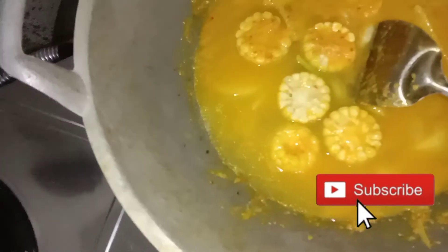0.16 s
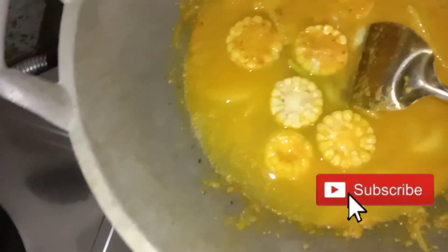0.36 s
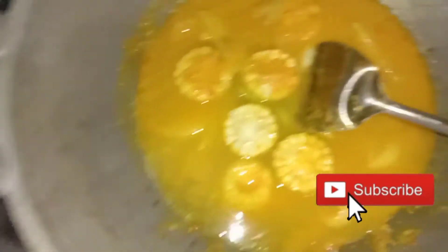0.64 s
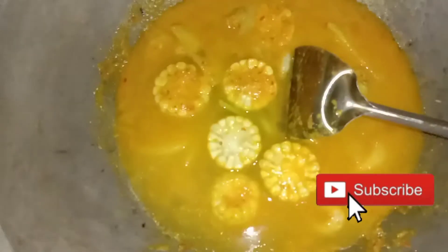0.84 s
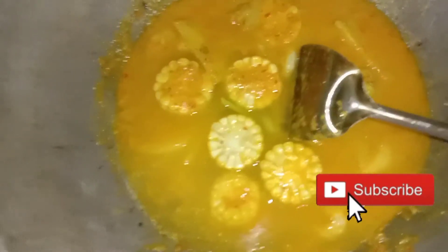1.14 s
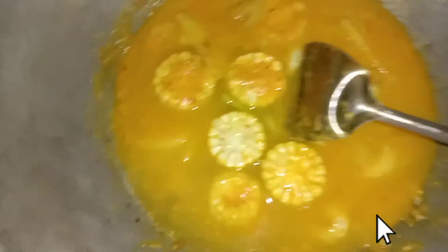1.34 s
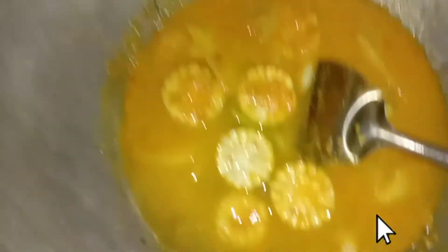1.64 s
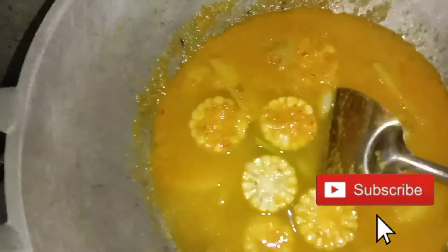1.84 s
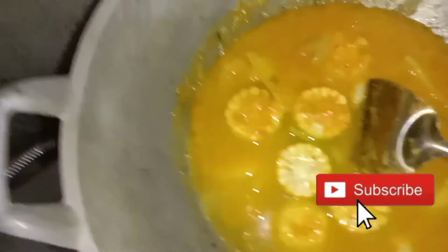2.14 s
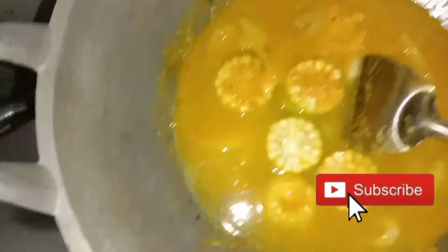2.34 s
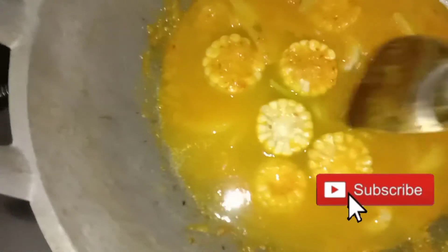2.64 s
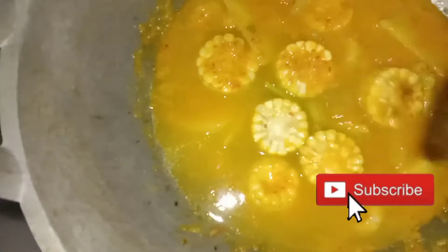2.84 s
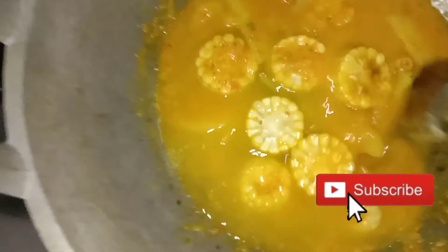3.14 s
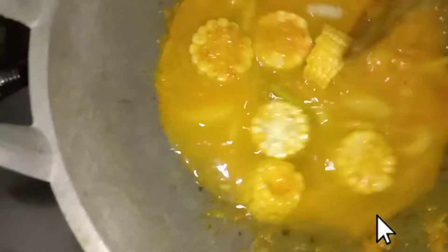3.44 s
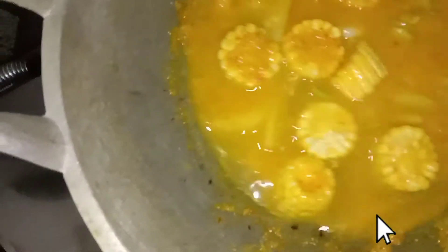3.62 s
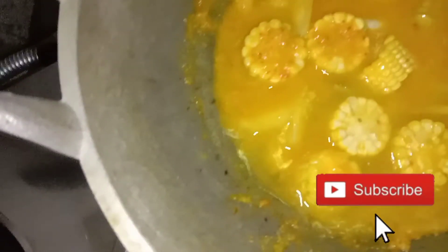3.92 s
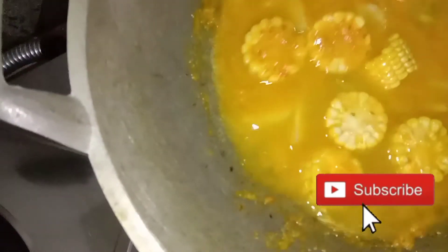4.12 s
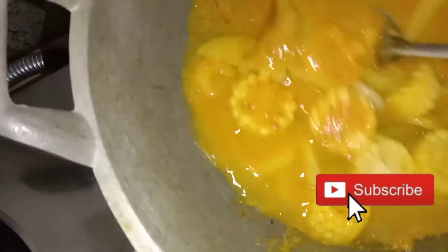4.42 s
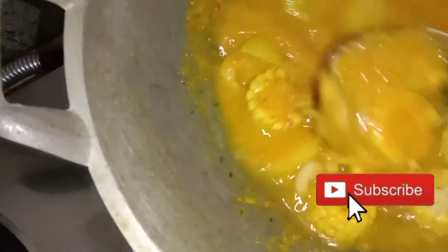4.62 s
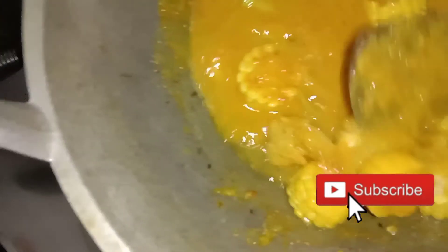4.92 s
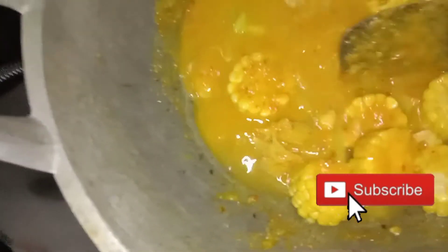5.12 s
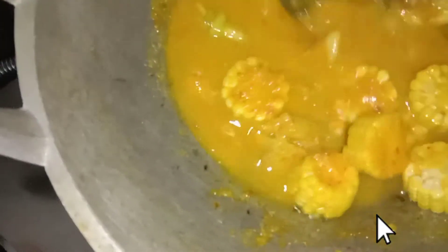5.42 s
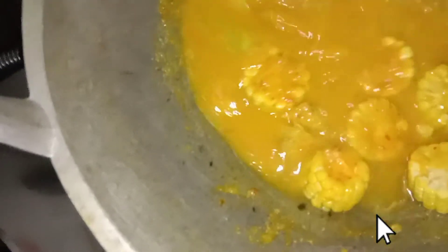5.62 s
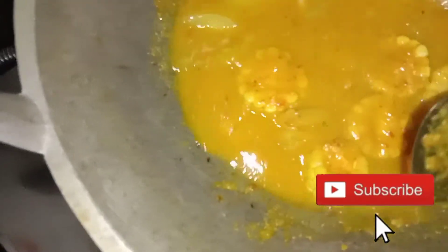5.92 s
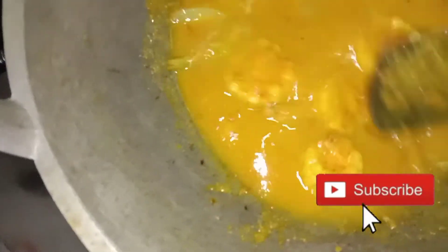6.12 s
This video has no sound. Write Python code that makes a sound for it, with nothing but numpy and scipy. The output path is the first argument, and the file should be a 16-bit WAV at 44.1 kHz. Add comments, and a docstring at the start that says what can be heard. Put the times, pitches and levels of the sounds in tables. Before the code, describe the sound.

Watery soup fizzes softly in a heavy metal wok while a spatula clanks and scrapes in two strokes, ending with a wet slap and drips.

```python
"""In a small kitchen, watery soup simmers in a thick wok, heard from close above.
The wok shifts on the stove with a dull clatter; a steel spatula rings, knocks and scrapes twice along the metal,
then tips its load back with a splash and a few drips. Knocks are shaped pulses, scrapes and grinding are
random grains coloured by the metal, and bubbles are short decaying tones that rise in pitch.
Fizz, room noise and a faint motor hum lie beneath."""
import sys
import numpy as np
from scipy import signal
from scipy.fft import rfft, irfft, next_fast_len
from scipy.io import wavfile
from scipy.ndimage import uniform_filter1d, map_coordinates

SR = 44100
rng = np.random.default_rng(int(sys.argv[2]) if len(sys.argv) > 2 else 0)


def store_wav(level_fs):
    """Save 16-bit WAV to argv[1]."""
    pcm = np.round(np.clip(np.atleast_2d(level_fs), -1, 1) * 32767)
    wavfile.write(sys.argv[1], SR, pcm.T.astype(np.int16))


N = 276044  # length in samples
T = np.arange(N) / SR  # time in seconds

# Every movement table (MOVE) holds: start, moment of greatest force, width of the swell and
# moment of letting go, all in seconds, then the fade in dB per second.
# Every TONE table colours a sound. Each row: frequency in Hz, relative gain in dB.
# PUSH_BANDS, SCOOP_BANDS, SHIFT_BANDS and POUR_BANDS hold one row per register, low to high:
# steady level in dB, swell at the greatest force in dB.

# The first stroke of the spatula along the wok.
PUSH_MOVE = dict(start=3.115, firmest=3.225, width=0.055, let_go=3.344, fade_db=341)
PUSH_TONE = [(59, -64), (100, -31.5), (302, -21.5), (547, -27), (648, -8.5), (854, -13), (930, 4),
             (1230, -23.5), (2470, -9), (2860, -10), (3700, -2), (4290, -4.5), (9210, -30.5),
             (15000, -30.5), (16000, -45.5)]
PUSH_BANDS = [(-34, 1), (-41, 7), (-35.5, 12)]


def push():
    """The spatula's edge scrapes forward over the metal in a dense run of slips."""
    return amp(-1.5) * scrape(PUSH_MOVE, PUSH_BANDS, PUSH_TONE, slips=4000, catch_db=3.5, ring_db=-4.5)


# The second stroke, which takes up the soup.
SCOOP_MOVE = dict(start=3.868, firmest=4.06, width=.09, let_go=4.131, fade_db=128)
SCOOP_TONE = [(59, -60.5), (100, -20), (308, -20.5), (558, -33), (818, -11), (1130, -5.5), (1650, -5),
              (2220, -19), (3050, -15.5), (3470, -11.5), (4200, -17), (5650, -15.5), (9820, -32.5),
              (15000, -26.5), (16000, -29)]
SCOOP_BANDS = [(-48, 8.1), (-43.5, 15), (-33, 2.5)]


def scoop():
    """The second scrape has fewer slips a second but catches harder."""
    return amp(-2.5) * scrape(SCOOP_MOVE, SCOOP_BANDS, SCOOP_TONE, slips=3500, catch_db=7, ring_db=-3.5)


def scrape(stroke, bands, tone, slips, catch_db, ring_db):
    """The steel edge sticks and slips over the rough cast metal, catching in short bursts."""
    catching = amp(catch_db * np.tanh(wobble(150)))
    rasp = grains(slips, scatter_db=4.0) * catching
    rasp = patchy(filtered(rasp, lambda hz: amp(along(tone, hz))), depth_db=5)
    ringing = room(wok(rasp, ring_db), wet_db=-5)
    return room(played(ringing, stroke, bands, [1150, 2400]), wet_db=-15)


# The edge chatters as the scoop digs in.
CHATTER_MOVE = dict(start=3.985, firmest=4.05, width=.07, let_go=4.222, fade_db=193)
FREE_HZ, LOADED_HZ, LOADING_S = 1944, 1490, .075  # pitch when free and under soup; time constant of the sinking


def chatter():
    """A rough resonance of the blade that sinks as the soup loads it."""
    since_start = np.maximum(T - CHATTER_MOVE["start"], 0)
    hz = LOADED_HZ + (FREE_HZ - LOADED_HZ) * np.exp(-since_start / LOADING_S)
    phase = 2 * np.pi * np.cumsum(hz) / SR
    rough = wobble(280) * np.cos(phase) + wobble(280) * np.sin(phase)
    return room(rough * effort(steady_db=-46, swell_db=18.5, **CHATTER_MOVE), wet_db=-11.5)


# Spatula blows; a hard edge contact is thin and bright.
# Each row: start in seconds, peak in dB before wok and room answer, lowest and highest frequency in Hz.
BLOWS = [(1.12, -42, 700, 5500), (3.086, -37.5, 300, 5000), (3.1086, -8.5, 180, 4200),
         (3.196, -19, 1500, 4030), (3.231, -11, 1100, 4200), (3.237, -12.5, 1947, 4200),
         (3.256, -17.5, 2320, 4500), (3.267, -15.5, 1830, 5040), (3.86, -17.5, 5200, 7500),
         (4.0411, -8.5, 1208, 14000), (4.07, -17.5, 1000, 6050), (4.078, -12.5, 1300, 6500),
         (4.097, -10, 750, 1883), (4.111, -18.5, 200, 800), (4.147, -12.5, 690, 7100)]
# Colour of steel meeting the wok. Each row: frequency in Hz, relative gain in dB.
CONTACT_TONE = [(80, -12.5), (250, -7), (800, -4.5), (1600, -1), (2100, -10), (2600, -11.5), (3100, -7.5),
                (3650, 3), (4200, -20.5), (5000, -6.5), (7000, -11), (9500, -22.5), (15500, -13)]


def blows():
    """The spatula strikes the wok; the firmness of the contact sets the band that is excited."""
    out = np.zeros(N)
    for s, db, low_hz, high_hz in BLOWS:
        hit = pulse(lambda hz: amp(along(CONTACT_TONE, hz)) * below(hz, high_hz) * above(hz, low_hz))
        t = np.arange(len(hit)) / SR
        skid = rng.standard_normal(len(t)) * amp(-60 * t / .014)  # the edge skids for a moment
        skid = skid / np.linalg.norm(skid)
        hit = hit + amp(3.5) * signal.fftconvolve(hit, skid)[:len(t)]
        hit = amp(db) * hit / np.abs(hit).max()
        add(out, s, room(wok(hit, ring_db=-6.5), wet_db=-5.5))
    return out


# Modes of the wok, damped by the soup. Each row: frequency in Hz, width in Hz, relative strength in dB.
WOK_MODES = [(310, 9.9, 6.5), (625, 7.5, 7), (802, 17, 9.5), (937, 16, 4.5), (1270, 14, -4), (1330, 20, 0),
             (1665, 6, 7), (1706, 30, 8), (2170, 19, 1.5), (2500, 36, 2.5), (3327, 41, 7.5), (3640, 55, 2)]


def wok(x, ring_db):
    """The contact itself plus the modes of the wok that it sets ringing."""
    def response(hz):
        modes = 0
        for mode_hz, width_hz, db in WOK_MODES:
            damping = 1j * hz * width_hz
            modes = modes + amp(db) * damping / (mode_hz ** 2 - hz ** 2 + damping)
        return 1 + amp(ring_db) * modes
    return filtered(x, response)


# The spatula is set ringing.
# Each row: start in seconds, level in dB, attack time constant in seconds, lowest and highest frequency in Hz.
RINGS = [(2.587, -39.5, .005, 600, 2900), (3.859, -26.5, .0004, 2992, 9000)]
# Modes of the free spatula. Each row: frequency in Hz, relative level in dB, 60 dB decay time in seconds.
BLADE_MODES = [(937, -10, 0.21), (1161, -7.5, .7), (1427, -4.5, .48), (1595, -4, 0.17), (2510, -2.5, 0.15),
               (3330, 2, 0.075), (4698, 12.5, 0.026), (5600, 7.5, 0.029)]


def blade():
    """The spatula slides against the metal and rings freely, as decaying sines over a rub of noise."""
    out, t = np.zeros(N), np.arange(SR) / SR
    for s, db, attack, low_hz, high_hz in RINGS:
        ring = np.zeros(SR)
        for hz, level, t60 in BLADE_MODES:
            strength = above(hz, low_hz) * below(hz, high_hz) * amp(level - 60 * t / t60)
            phase = 2 * np.pi * (hz * t + rng.random()) + .45 * wobble(60)[:SR]
            ring += strength * np.sin(phase)
        rub = filtered(rng.standard_normal(SR), lambda hz: below(hz, 2600) * above(hz, low_hz, order=4))
        rub = unit(rub) * amp(-60 * t / 0.16)
        onset = (1 - np.exp(-t / attack)) ** 3
        add(out, s, amp(db) * (ring + amp(-8.5) * rub) * onset)
    return room(out, wet_db=-4.5)


# The wok rocking on its support. Each row: start in seconds, level in dB before the room answers.
ROCKS = [(.177, -19.5), (.187, -17.5), (.223, -18.5), (.227, -16.5), (.24, -30), (.263, -22), (.296, -32.5),
         (.317, -30.5)]
# The grinding of the wok over its support, and the colour of that contact.
SHIFT_MOVE = dict(start=.18, firmest=.247, width=0.027, let_go=0.31, fade_db=223)
SHIFT_BANDS = [(-47, 10), (-41.5, 10)]
SUPPORT_TONE = [(30, -53.5), (80, -32.5), (230, -11), (420, -16.5), (750, 0.5), (1030, 5.5), (1330, 1),
                (1620, -17), (1950, -8.5), (2650, -28.5)]


def shifting():
    """The heavy wok grinds over its support and rocks to rest, leaving a short hum in the metal."""
    colour = lambda hz: amp(along(SUPPORT_TONE, hz)) * below(hz, 2700, order=14)
    knocks, knock = np.zeros(N), pulse(colour)
    t = np.arange(len(knock)) / SR
    for s, db in ROCKS:
        hum_hz = 1015 + 18 * rng.standard_normal()
        hum = np.sin(2 * np.pi * hum_hz * t) * amp(-60 * t / 0.32)
        add(knocks, s, amp(db) * (knock + amp(-23) * hum))
    grind = room(filtered(grains(rate=1200, scatter_db=3.5), colour), wet_db=-2.5)
    return room(knocks, wet_db=-5.0) + played(grind, SHIFT_MOVE, SHIFT_BANDS, [600])


# The load of soup running back into the wok.
POUR_MOVE = dict(start=5.148, firmest=5.19, width=.07, let_go=5.436, fade_db=138)
POUR_TONE = [(26, -54), (45, -36), (104, 5), (321, -17.5), (411, 1), (552, -25), (779, -15), (1890, -14.5),
             (2190, -23.5), (3490, -1.5), (4140, -11.5), (5560, -5), (9320, -20), (14900, -15),
             (16000, -17)]
POUR_BANDS = [(-58.5, 1.5), (-65, 15), (-51.5, 2.8)]


def splash(start=5.1392):
    """Soup slaps back into the wok; the rest follows in a spray and a gurgle that sinks in pitch."""
    out, t = np.zeros(N), np.arange(SR // 2) / SR
    burst = rng.standard_normal(len(t)) * amp(-60 * t / 0.017)
    slap = filtered(burst, lambda hz: above(hz, 1080, order=5) * below(hz, 5400, order=1))
    add(out, start, room(amp(-17) * slap, wet_db=-7))
    spray = filtered(grains(rate=1000, scatter_db=3.5), lambda hz: amp(along(POUR_TONE, hz)))
    spray = patchy(room(spray, wet_db=-3.0), depth_db=5.5)
    gurgle = bubbles(5.18, 5.46, count=48, first_hz=1120, last_hz=432, spread=1.33, cycles=12.6)
    return out + played(spray, POUR_MOVE, POUR_BANDS, [500, 2500]) + amp(-46.5) * room(gurgle, wet_db=-4)


# The larger bubbles and drips. Each row: start in seconds, peak in dB before the room answers, initial pitch in Hz.
PLOPS = [(.569, -52.5, 810), (0.875, -53, 1466), (1.145, -55, 730), (1.293, -54, 1260), (2.405, -50.5, 660),
         (2.946, -37.5, 782), (4.468, -46.5, 1194), (5.115, -27.5, 5326), (5.131, -36, 2380),
         (5.1391, -14, 5260), (5.188, -35, 3600), (5.2, -37.5, 752), (5.322, -37.5, 3520),
         (5.809, -18, 5340)]
PLOP_T60_S, PLOP_SIZE_LAW = .023, .75  # decay time at 1 kHz; bigger, lower bubbles ring longer by this power


def plops():
    """The larger bubbles and drips; the faint ones lie farther off, so more of the room is heard."""
    out = np.zeros(N)
    for s, db, hz in PLOPS:
        wet_db = -9.5 + 0.19 * max(-26.5 - db, 0)
        t60 = PLOP_T60_S * (1000 / hz) ** PLOP_SIZE_LAW
        plop = np.pad(amp(db) * bubble(hz, t60), (0, SR // 3))  # leaves space for the room
        add(out, s, room(plop, wet_db))
    return out


# Soup spits on the hot rim with a dry click. Each row: start in seconds, level in dB before the bass is removed.
SPITS = [(1.253, -33.5), (3.514, -29.5), (4.799, -47), (4.85, -45), (4.904, -43), (4.951, -30.5),
         (5.079, -31), (5.881, -29.5)]


def spits():
    """Tiny bubbles burst on the hot rim, too small to radiate any bass."""
    out = np.zeros(N)
    for s, db in SPITS:
        add(out, s, amp(db) * bubble(hz=6760, t60=0.00056))
    return room(filtered(out, lambda hz: above(hz, 5700, order=4)), wet_db=-5)


# The simmer's lower seething and its upper fizz.
# Each row: level in dB, extra at first in dB, drop once stirred in dB.
SIMMER_LEVELS = [(-67.5, 2, 19), (-61, 4.5, 5.5)]
# The simmer's colour. Each row: frequency in Hz, relative gain in dB.
FIZZ_TONE = [(100, -30), (300, -17.5), (750, -10.5), (1550, -16), (2000, -18.5), (2800, -18.5), (3400, 2),
             (3750, 0), (4150, -17), (4850, -16.5), (5800, 4.5), (6250, -4.5), (7500, -4), (9500, -15.5),
             (13500, -15.5), (15400, -8)]
SETTLE_S = 0.76  # the first brisk sizzle settles on this time scale
STIRRED_S, CALMING_S = 3.5, 1.4  # when stirring calms the simmer, and how long that takes
REVIVES_S, REVIVING_S = 5.86, 0.56  # when it begins to return, and how long a full return would take


def simmer():
    """Countless small bubbles fizz and tick at the hot rim, until stirring calms them; larger ones burble."""
    fizz = room(grains(rate=4200, scatter_db=9.0), wet_db=-7.5)
    fizz = filtered(fizz, lambda hz: amp(along(FIZZ_TONE, hz)))
    fizz = patchy(fizz, depth_db=3.5) * amp(1.2 * wobble(24))
    brisk = np.exp(-(T / SETTLE_S) ** 2)
    calm = np.clip((T - STIRRED_S) / CALMING_S, 0, 1) - np.clip((T - REVIVES_S) / REVIVING_S, 0, 1)
    seething = np.zeros(N)
    for band, (db, extra_db, drop_db) in zip(registers(fizz, [4600]), SIMMER_LEVELS):
        seething += band * amp(db + extra_db * brisk - drop_db * calm)
    ticks = bubbles(0, 5.6, count=110, first_hz=9050, last_hz=10000, spread=0.72, cycles=5.3) * amp(-4 * calm)
    pips = bubbles(0, 3.2, count=70, first_hz=4500, last_hz=4400, spread=0.67, cycles=34)
    burble = bubbles(0.26, 3.4, count=46, first_hz=990, last_hz=760, spread=.8, cycles=7)
    return seething + room(amp(-42.5) * ticks, wet_db=-4) + room(amp(-53.5) * (pips + burble), wet_db=-2)


# Colour of the room noise. Each row: frequency in Hz, relative gain in dB.
AIR_TONE = [(25, -36.5), (60, -12.5), (140, -2), (200, -8.5), (310, -8.5), (600, -16.5), (900, -19),
            (1600, -17.5), (2500, -29.5)]


def background():
    """Low room noise and the faint, unsteady hum of a kitchen motor."""
    air = unit(filtered(rng.standard_normal(N), lambda hz: amp(along(AIR_TONE, hz))))
    hum_hz = 147.5 + 0.79 * wobble(11)
    hum = np.sin(2 * np.pi * np.cumsum(hum_hz) / SR) * amp(3.2 * wobble(2.5))
    return amp(-74.5) * air + amp(-77) * hum


# How long the kitchen rings. Each row: frequency in Hz, 60 dB decay time in seconds.
KITCHEN_DECAY = [(150, 0.44), (1000, 0.31), (4000, 0.26), (9000, 0.37), (16000, .18)]


def room(x, wet_db):
    """x with the kitchen's answer, decaying noise which starts a few milliseconds late."""
    hz, t, z = signal.stft(rng.standard_normal(SR // 2), SR, nperseg=256)
    decay = amp(-60 * t / along(KITCHEN_DECAY, hz)[:, None])
    tail = signal.istft(z * decay, SR, nperseg=256)[1]
    tail = np.pad(tail / np.linalg.norm(tail), (SR // 200, 0))
    return x + amp(wet_db) * signal.fftconvolve(x, tail)[:len(x)]


def bubble(hz, t60):
    """A bubble swells quickly and rings down, rising in pitch from hz by about a fifth of its value; peak 1."""
    t = np.arange(int(2 * t60 * SR) + 2) / SR
    pitch = hz * (1 + 0.21 * np.minimum(t / t60, 1))
    onset = 1 - np.exp(-(t / (0.071 * t60)) ** 2)
    ring = np.sin(2 * np.pi * np.cumsum(pitch) / SR) * amp(-60 * t / t60) * onset
    return ring / np.abs(ring).max()


def bubbles(start, end, count, first_hz, last_hz, spread, cycles):
    """A swarm of bubbles, spread octaves either side of a pitch that drifts from first_hz to last_hz."""
    out = np.zeros(N)
    for when, size, strength in rng.random((count, 3)):
        typical_hz = first_hz * (last_hz / first_hz) ** when
        hz = typical_hz * 2 ** (spread * (2 * size - 1))
        add(out, start + when * (end - start), amp(-14 * strength) * bubble(hz, cycles / hz))
    return out


def grains(rate, scatter_db):
    """Tiny impulses, rate a second on average, at random times and of uneven size, rms 1."""
    size = amp(scatter_db * np.clip(rng.standard_normal(N), -2, 1))
    present = rng.random(N) < rate / SR
    return unit(present * size * rng.choice([-1, 1], N))


def patchy(x, depth_db):
    """Narrow bands of x rise and fall at random, each for a short while."""
    z = signal.stft(x, nperseg=1024)[2]
    field = uniform_filter1d(rng.standard_normal(z.shape), size=4, axis=0)  # smooth over frequency
    field = uniform_filter1d(field, size=5, axis=1)  # smooth over time
    return signal.istft(z * amp(depth_db * unit(field)), nperseg=1024)[1][:N]


SWELL_SHAPE = 1.5  # lower gives a sharper crest on wider shoulders


def effort(steady_db, swell_db, start, firmest, width, let_go, fade_db):
    """Gain of one movement: it sets in within 8 ms, swells to its greatest force and fades when let go."""
    force = np.exp(-np.abs((T - firmest) / width) ** SWELL_SHAPE)
    level_db = steady_db + swell_db * force - fade_db * np.maximum(T - let_go, 0)
    return amp(level_db) * np.clip((T - start) / .008 + .5, 0, 1)


def played(x, movement, bands, splits_hz):
    """Every register of x follows the same movement with its own level and swell."""
    out = np.zeros(N)
    for band, (db, swell_db) in zip(registers(x, splits_hz), bands):
        out += band * effort(db, swell_db, **movement)
    return out


def registers(x, splits_hz):
    """x split into bands, low to high, each of rms 1."""
    bands = []
    for top_hz in [*splits_hz, SR]:
        band = filtered(x, lambda hz: below(hz, top_hz, order=8))
        x = x - band
        bands.append(unit(band))
    return bands


def pulse(gain, size=16384):
    """The causal, minimum-phase pulse of peak 1 that has this gain over frequency."""
    cepstrum = irfft(np.log(np.maximum(gain(np.fft.rfftfreq(size, 1 / SR)), 1e-6)))
    cepstrum[1:size // 2] *= 2  # fold the part before time zero onto the part after it
    cepstrum[size // 2 + 1:] = 0
    x = irfft(np.exp(rfft(cepstrum)))
    return x / np.abs(x).max()


def wobble(rate):
    """A smooth random curve, rate knots a second."""
    return map_coordinates(rng.standard_normal(int(N * rate / SR) + 4), [T * rate])


def filtered(x, response):
    """x times a response of frequency."""
    m = next_fast_len(len(x) + SR // 2)
    return irfft(rfft(x, m) * response(np.fft.rfftfreq(m, 1 / SR)), m)[:len(x)]


def below(hz, corner_hz, order=2):
    """Gain of a low-pass."""
    return 1 / np.sqrt(1 + (hz / corner_hz) ** (2 * order))


def above(hz, corner_hz, order=2):
    """Gain of a high-pass; the added 1 Hz avoids dividing by zero."""
    return below(corner_hz, hz + 1, order)


def along(points, hz):
    """Values read between (Hz, value) points on a log axis."""
    f, v = np.transpose(points)
    return np.interp(np.log(hz + 1), np.log(f + 1), v)


def amp(db):
    """Decibels as an amplitude factor."""
    return 10 ** (np.asarray(db) / 20)


def unit(x):
    """x scaled to rms 1."""
    return x / np.sqrt(np.mean(x ** 2) + 1e-20)


def add(track, s, x):
    """Mix x into the track at time s."""
    part = track[round(s * SR):][:len(x)]
    part += x[:len(part)]


def scene():
    """Everything reaches one microphone above the wok."""
    spatula = push() + scoop() + chatter() + blows() + blade()
    soup = splash() + plops() + spits() + simmer()
    mono = spatula + shifting() + soup + background()
    return np.array([mono, mono])


def record(dry):
    """One small microphone, weak in the deep bass, feeds both channels up to its band limit."""
    thin = signal.sosfilt(signal.butter(2, 35, "high", fs=SR, output="sos"), dry)
    return np.array([filtered(x, lambda hz: below(hz, 15650, order=90)) for x in thin])


dry = scene()
out = record(dry)
store_wav(out)
```